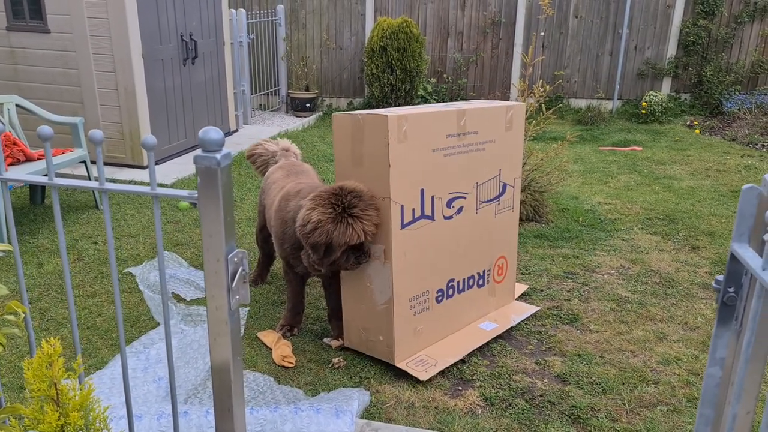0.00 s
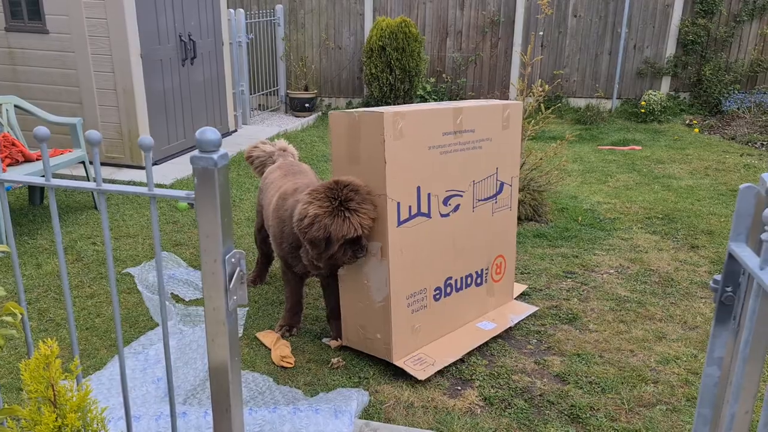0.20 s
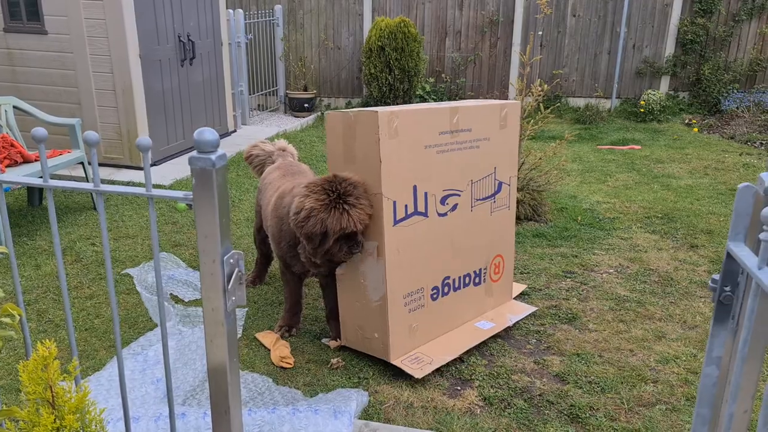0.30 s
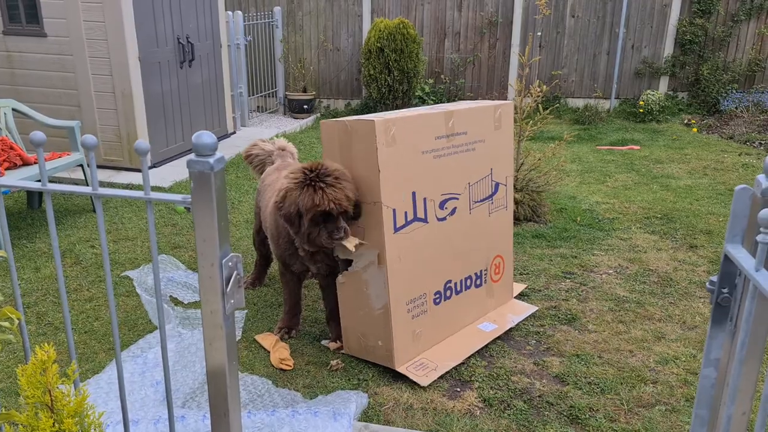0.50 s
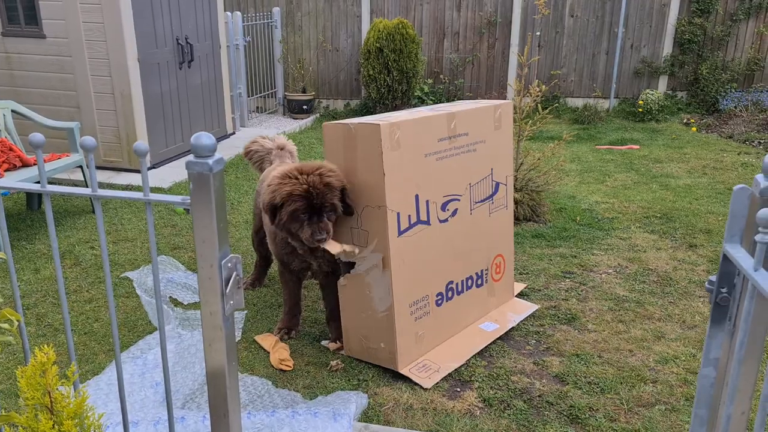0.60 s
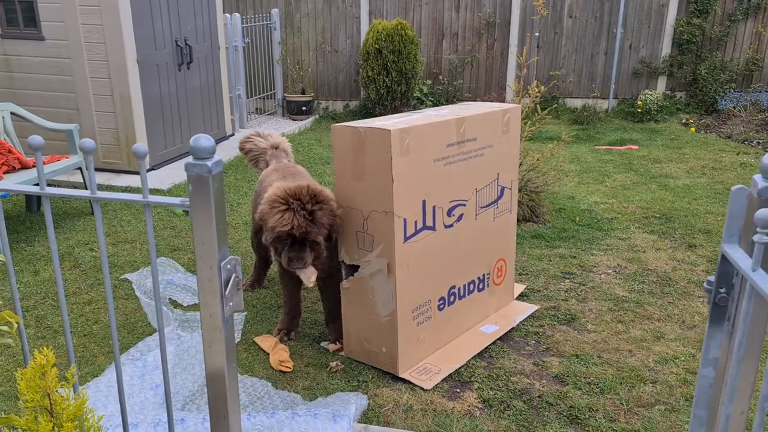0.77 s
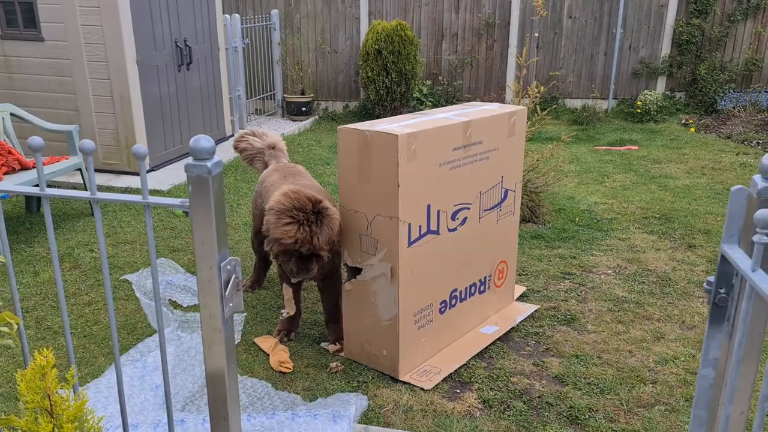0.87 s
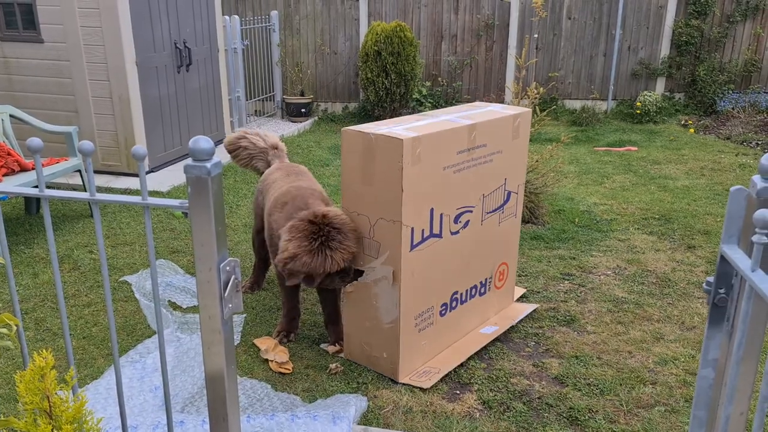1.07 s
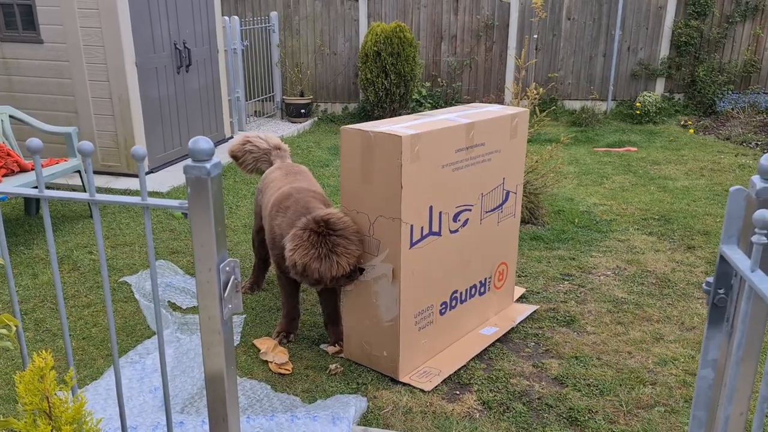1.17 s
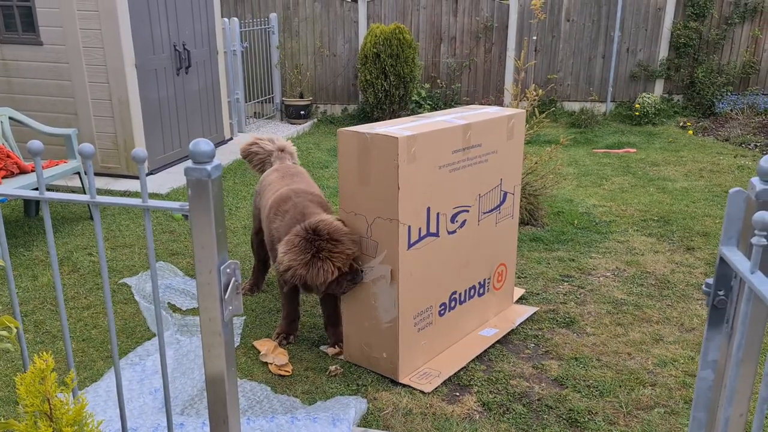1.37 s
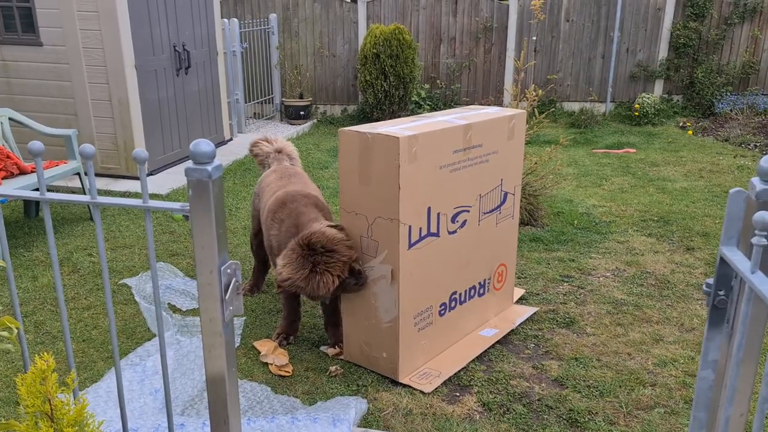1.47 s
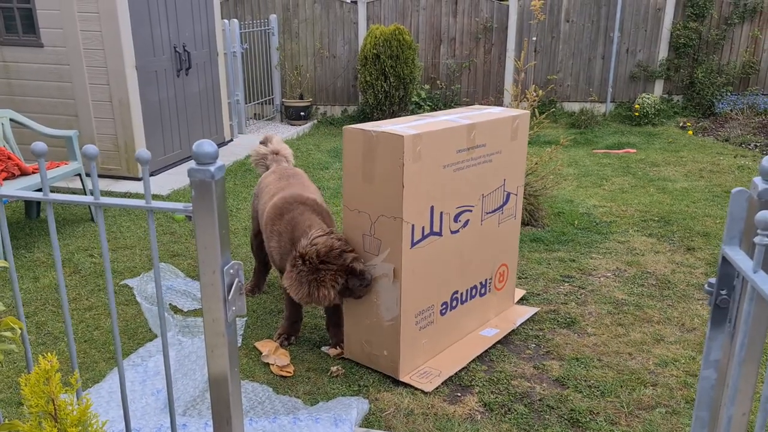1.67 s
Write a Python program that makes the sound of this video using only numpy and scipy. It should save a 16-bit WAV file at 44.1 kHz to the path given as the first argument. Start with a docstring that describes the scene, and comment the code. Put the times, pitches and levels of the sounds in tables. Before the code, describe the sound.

A dog rips a tall cardboard box on a lawn, fibres crackling and walls booming, then pauses and nudges it with a dull scuff; distant birdsong and soft outdoor hush, picked up by a phone from a few metres.

```python
"""Teeth and fur brush card over a garden hush; then a big dog tugs and rips a strip off a tall cardboard box
on a lawn, a few metres from a phone. Fibres and plies crackle as clumped random clicks, and each tug
booms in the box as decaying wall modes, a flex and a thud; later the muzzle bumps it.
Far off a small bird sings gliding sine notes; shaped noise makes the hush, the road and the fence echo."""
import sys
import numpy as np
from scipy import signal
from scipy.fft import rfft, irfft, next_fast_len
from scipy.io import wavfile
from scipy.ndimage import uniform_filter1d, map_coordinates

SR = 44100
rng = np.random.default_rng(int(sys.argv[2]) if len(sys.argv) > 2 else 0)


def dump_mix(stems):
    """Bounce the given channels to the path in sys.argv[1] as a 16-bit WAV at rate SR."""
    frames = np.atleast_2d(stems).T  # one column per channel
    limited = np.clip(frames, -1, 1)  # hard clip at full scale
    pcm = np.round(limited * 32767).astype(np.int16)
    wavfile.write(sys.argv[1], SR, pcm)


def nominal_scale(level):
    """Amplitude ratio for a level in decibels (scalar or array-like)."""
    x = np.asarray(level, float) / 20
    return 10 ** x


N = 74970

# modes of the box walls: (frequency [Hz], level [dB], t60 [s])
BOX_MODES = [(109.4, -8.5, 0.23), (152, 4, 0.095), (183.3, 4, 0.17), (234.5, -1.5, 0.15), (292.6, 0, 0.19),
             (341, -6.5, 0.089), (408.5, -4, 0.079), (456.2, -2, 0.074), (521, -9, 0.19), (677, -6, 0.1),
             (732, -9, 0.14), (1016, -9, 0.04), (1083, -26, 0.37), (1190, -7.5, 0.2), (1322, -8, 0.17),
             (2195, -8, 0.094)]
# likeness of the two microphones for the near sounds: (frequency [Hz], correlation [-1 to 1])
NEAR_ALIKE = [(60, 0.36), (290, 1), (640, 0.23), (1400, 0.39), (3100, 0.097), (6800, 0.68), (15000, 0.12)]
# left-right balance of the near sounds: (frequency [Hz], left over right [dB])
NEAR_LEAN = [(300, 2), (700, -0.5), (1300, -8), (2400, -1), (4400, 0.5), (8100, -1.5), (15000, -9.5)]


def unit(x):
    """Scales to rms 1."""
    return x / np.sqrt(np.mean(x ** 2) + 1e-20)


def along(points, hz):
    """Reads (Hz, value) points on a log frequency axis."""
    f, v = np.transpose(points)
    return np.interp(np.log(hz + 1), np.log(f + 1), v)


def curves(rows):
    """One value per sample for each column after the time."""
    s, *cols = np.transpose(rows)
    return [np.interp(np.arange(N) / SR, s, c) for c in cols]


def wobble(rate):
    """A smooth random curve, rate knots a second."""
    return map_coordinates(rng.standard_normal(N // 50), [np.arange(N) * rate / SR])


def filtered(x, response):
    """x through a complex response of frequency."""
    m = next_fast_len(N + SR // 2)
    return irfft(rfft(x, m) * response(np.fft.rfftfreq(m, 1 / SR)), m)[..., :N]


def ringing(modes):
    """Response of decaying modes (Hz, dB, t60), each starting at its level."""
    def response(f):
        total = 0
        for hz, db, t60 in modes:
            damping = 1j * f * np.log(1000) / (np.pi * t60)
            total = total + nominal_scale(db) * SR * hz / (2 * np.pi) / (hz * hz - f * f + damping)
        return total
    return response


def snaps(per_s, spread_db):
    """Two independent streams of random clicks of uneven size, per_s clicks a second in each."""
    hit = rng.random((2, N)) < per_s / SR
    return hit * rng.standard_normal((2, N)) * nominal_scale(spread_db * rng.exponential(size=(2, N)))


def spread(pair, spectrum, alike, lean, lag_us=48.6):
    """Colours two streams and mixes them to stereo of given likeness, balance and left lag; mid rms 1."""
    def mid_side(hz):
        turn = np.arccos(np.clip(along(alike, hz), -1, 1)) / 2
        return nominal_scale(along(spectrum, hz)) * [np.cos(turn), np.sin(turn)]

    def left_right(hz):
        # half of the balance and lag on the left, the inverse on the right
        half = nominal_scale(along(lean, hz) / 2) * np.exp(-1j * np.pi * hz * lag_us / 10 ** 6)
        return np.array([half, 1 / half])

    mid, side = filtered(pair, mid_side)
    both = filtered(np.array([mid + side, mid - side]), left_right)
    return both / np.sqrt(np.mean(both.mean(axis=0) ** 2))


def patchy(pair, depth_db, bins_count, frames_count):
    """Random gain patches over time and frequency, depth_db rms."""
    z = signal.stft(pair, nperseg=512)[2]
    field = rng.standard_normal(z.shape[1:])
    field = uniform_filter1d(uniform_filter1d(field, bins_count, 0), frames_count, 1)
    return signal.istft(z * nominal_scale(depth_db * unit(field)), nperseg=512)[1][:, :N]


def garden():
    """Far traffic and leaves as a patchy low hush of noise, over the steady rumble of a distant road."""
    # far traffic and leaves: (time [s], level [dB])
    air = [(0, -51.5), (.17, -53.5), (.7, -60), (.8, -60.5), (.9, -61), (1.0, -61.5), (1.1, -58),
           (1.35, -65), (1.5, -69.5), (1.58, -61.5), (1.7, -64)]
    # colour of the hush: (frequency [Hz], level [dB])
    hush_colour = [(25, -7), (100, -18.5), (160, -5), (290, 2), (430, -8), (1300, -9.5), (2100, -7),
                   (2800, -17.5), (4500, -20), (6500, -22), (7300, -26.5), (8300, -29), (9500, -19),
                   (12000, -27), (15900, -32)]
    # colour of the distant road: (frequency [Hz], level [dB])
    road_colour = [(20, 10), (50, 13), (100, 14), (200, -28), (400, -76)]
    # likeness of the two microphones for far sound: (frequency [Hz], correlation [-1 to 1])
    far_alike = [(60, 0.4), (290, 0.97), (640, 0.46), (1400, 0.23), (3100, 0.042), (15000, 0.25)]
    even = [(100, -0.22), (10000, -1.6)]  # (frequency [Hz], left over right [dB])
    road_db, gust_db = -82, 0.7
    air_db, = curves(air)
    pair = patchy(rng.standard_normal((2, N)), depth_db=4, bins_count=4, frames_count=10)
    road = nominal_scale(road_db) * spread(rng.standard_normal((2, N)), road_colour, far_alike, even, lag_us=0)
    hush = spread(pair, hush_colour, far_alike, even, lag_us=0)
    return road + nominal_scale(air_db + gust_db * wobble(10.13)) * hush


def bird():
    """Each note is a sine that drops onto its held pitch and flutters with a slight burr."""
    # notes: (start [s], length [s], held pitch [Hz], start above it [Hz], relative level [dB])
    song = [(.772, .03, 4900, 1200, -72), (.848, .047, 4880, 550, -66), (.92, .11, 4880, 150, -74),
            (1.005, .138, 3790, 600, -65), (1.066, .02, 4260, 80, -64), (1.128, .03, 3050, 700, -67),
            (1.412, .145, 4270, 20, -73.5), (1.585, .014, 4750, 350, -66)]
    rise_s, drop_s = 0.004, 0.012  # time constants
    flutter_hz, flutter_depth = 60, 0.15
    burr_share, waver_db = 0.16, 1.3  # pitch burr as a share of each note's drop; level waver
    out = np.zeros(N + SR)
    burr = burr_share * wobble(300)
    for s, length, hz, over_hz, db in song:
        t = np.arange(round(length * SR)) / SR
        start = round(s * SR)
        flutter = 1 + flutter_depth * np.sin(2 * np.pi * flutter_hz * t)
        shape = (1 - np.exp(-t / rise_s)) * (1 - (t / length) ** 8) * flutter
        pitch = hz + over_hz * (burr[start:][:len(t)] + np.exp(-t / drop_s))
        out[start:][:len(t)] += nominal_scale(db + 6.5) * shape * np.sin(2 * np.pi * np.cumsum(pitch) / SR)
    return out[:N] * nominal_scale(waver_db * wobble(40))


def fence(x):
    """Fences and shed answer; each frequency dies at its own speed, the bass alike on both sides."""
    # decay of the answer: (frequency [Hz], t60 [s])
    decay = [(100, 0.25), (1000, 0.14), (10000, 0.029)]
    hz, t, z = signal.stft(rng.standard_normal((2, SR // 2)), SR, nperseg=256)
    z = np.array([z[0], np.where(hz[:, None] < 200, z[0], z[1])])
    tail = signal.istft(z * nominal_scale(-60 * t / along(decay, hz)[:, None]), SR, nperseg=256)[1]
    tail = tail / np.linalg.norm(tail[0])
    late = np.pad(x, (500, 0))[None]  # 500 samples on the way there and back
    return signal.fftconvolve(late, tail, axes=1)[:, :N]


def scuffs():
    """Fur and teeth brush the card: grainy clicks rise and decay, with a dull and a bright part."""
    # brushes: (time [s], dull level [dB], rise time constant [s], t60 [s], bright level [dB])
    brushes = [(.02, -50, 0.09, 0.34, -38.5), (0.665, -51, 0.0071, 0.12, -57),
               (0.808, -61, 0.0051, 0.98, -69.5), (0.854, -58.5, 0.015, 0.22, -78),
               (1.028, -54.5, 0.02, 0.18, -62), (1.087, -79, 0.0034, 0.021, -52),
               (1.161, -37.5, 0.011, 0.25, -58.5), (1.262, -53, 0.0034, 0.065, -62),
               (1.399, -63, 0.0013, 0.38, -62.5), (1.489, -65.5, 0.015, 0.52, -67.5),
               (1.586, -57, 0.0036, 0.041, -60), (1.639, -59, 0.0066, 0.1, -66)]
    # colour of the dull part: (frequency [Hz], level [dB])
    dull_colour = [(250, -12), (450, 0), (800, -5), (1200, -6), (1900, -4), (2500, -13.5), (3500, -20),
                   (5200, -25.5), (8000, -55)]
    # colour of the bright part: (frequency [Hz], level [dB])
    bright_colour = [(2000, -16), (4000, -2), (6500, -7.5), (8300, -4.5), (10000, -3), (12500, -11),
                     (15000, -10), (16000, -11)]
    grains_per_s, grain_spread_db = 8000, 1.8
    since = np.clip(np.arange(N) / SR - np.array(brushes)[:, :1], 0, 9)
    dull_db, rise, t60, bright_db = np.transpose(brushes)[1:, :, None]
    shape = nominal_scale(-60 * since / t60 + 0.79 * wobble(67.7)) * (1 - np.exp(-since / rise))
    dull = spread(snaps(grains_per_s, grain_spread_db), dull_colour, NEAR_ALIKE, NEAR_LEAN)
    bright = spread(snaps(grains_per_s, grain_spread_db), bright_colour, NEAR_ALIKE, NEAR_LEAN)
    return (nominal_scale(dull_db) * shape).sum(axis=0) * dull + (nominal_scale(bright_db) * shape).sum(axis=0) * bright


def jolts():
    """Each tug or bump is a soft push: a dead thud, wall modes in a fresh mix, a flex of the big face."""
    # tugs and bumps: (time [s], relative wall ring [dB], contact [ms], flex [dB], relative thud [dB])
    pushes = [(.004, -45, 2.24, -61, -42), (0.191, -33, 1.6, -26.5, -30), (0.202, -45, 1.2, -30, -41),
              (0.242, -24.5, 2.12, -32, -27.5), (0.261, -33, 1.75, -37, -32.5),
              (0.302, -32.5, 2.53, -29.5, -26), (0.3364, -25.5, 2.54, -21, -13.5),
              (0.351, -24, 2.22, -31, -31), (0.363, -15, 2.52, -30, -14.5), (.381, -16.5, 2.12, -18.5, -22),
              (.398, -37, 3.06, -17, -18), (0.411, -17.5, 2.68, -23.5, -21.5),
              (.424, -24.5, 2.02, -26, -24.5), (0.442, -43, 2.24, -26, -53), (0.518, -26, 2.9, -28, -34),
              (0.564, -53, 1.73, -41.5, -35), (0.609, -38, 2.37, -29, -28), (0.64, -51, 2.5, -33, -45),
              (0.713, -67, 2.6, -54.5, -47.5), (1.1543, -24, 3.3, -70, -19), (1.1552, -45, 1.07, -70, -30),
              (1.166, -33, 1.15, -70, -37), (1.185, -36, 1.2, -70, -40), (1.209, -41, 2.8, -70, -38),
              (1.248, -48, 3, -70, -44), (1.262, -43.5, 2.86, -72, -40), (1.278, -51, 2.85, -74, -52.5)]
    mix_db = 2  # standard deviation of each mode's level from push to push
    flex_hz, flex_t60 = 49, 0.22  # the big face flexing as a whole
    thud_cycles_per_contact, thud_t60 = 0.422, 0.048  # the air in the box, pushed once
    out, t = np.zeros(N + SR), np.arange(SR // 2) / SR
    mix = rng.standard_normal((len(pushes), len(BOX_MODES)))
    hz, level, t60 = np.transpose(BOX_MODES)[:, :, None]
    for (s, db, ms, flex_db, thud_db), m in zip(pushes, mix):
        soft = 1 / (1 + (hz * ms / 900) ** 2)  # a longer contact excites less treble
        mode_amp = soft * nominal_scale(level + mix_db * m[:, None] - 60 * t / t60)
        ring = (mode_amp * np.sin(2 * np.pi * hz * t)).sum(axis=0)
        flex = nominal_scale(flex_db - 60 * t / flex_t60) * np.sin(2 * np.pi * flex_hz * t)
        flex = flex * (1 - np.exp(-t / 0.016))
        thud_hz = thud_cycles_per_contact / (ms / 1000)
        thud = nominal_scale(thud_db + 6 - 60 * t / thud_t60) * np.sin(2 * np.pi * thud_hz * t)
        onset = 1 - np.exp(-(t / 0.003) ** 2)
        out[round(s * SR):][:len(t)] += flex + (nominal_scale(db - 5.5) * ring - thud) * onset
    return out[:N]


def cracks():
    """Single plies crack out loud: each is a short noisy burst in a few dead modes."""
    # cracks: (time [s], relative level [dB])
    loud_plies = [(0.195, -33.5), (0.2456, -35), (0.3369, -27.5), (0.3515, -21), (0.364, -29), (.4416, -31),
                  (.567, -34), (.591, -32), (0.609, -35.5), (1.1543, -38), (1.182, -46)]
    # modes of a cracking ply: (frequency [Hz], level [dB], t60 [s])
    ply_modes = [(1200, 0, .015), (2100, -1, .012), (4800, -12, .004), (10500, -16, .004)]
    kicks = np.zeros(N)
    bursts = rng.standard_normal((len(loud_plies), 60)) * np.exp(-np.arange(60) / 25)
    for (s, db), burst in zip(loud_plies, bursts):
        kicks[round(s * SR):][:60] += nominal_scale(db - 15) * burst
    return filtered(kicks, ringing(ply_modes)) * nominal_scale([[-1.5], [1.5]])  # a little to the right


def rip():
    """Fine fibres hiss; coarse plies crackle in clumps, drum the walls and ring the torn strip."""
    # course of the rip: (time [s], fibre crackle [dB], coarse ply force over fibre [dB])
    course = [(0.0, -61.5, -2), (0.082, -63, -1), (0.098, -80, -39), (0.136, -53, -12), (0.176, -57.5, -2),
              (0.196, -41, -2), (0.23, -57, 3.5), (0.258, -43, 0.5), (0.296, -51.5, -1.5),
              (0.308, -45.5, 0), (0.352, -42.5, 5.5), (0.38, -43.5, -0.5), (0.418, -42.5, 3),
              (0.476, -36, 2.5), (0.506, -38, 2.5), (0.572, -36.5, -1), (0.61, -38, 3.5), (0.63, -52, -0.5),
              (0.688, -73.5, -5), (0.75, -59.5, 15.5)]
    # colour of the fibres: (frequency [Hz], level [dB])
    fibre_colour = [(1530, -22.5), (2600, -10), (2910, -9.5), (3440, -18.5), (4840, -9), (6910, -16.5),
                    (10400, -2.5), (13200, -10), (15100, -3.5), (15900, -65)]
    # colour of the plies: (frequency [Hz], level [dB])
    ply_colour = [(190, -87), (330, -13), (432, -6), (646, -1), (875, -38), (923, -1.5), (1090, -21.5),
                  (1310, -1), (1550, -8.5), (1870, -1), (2800, -22), (3640, -57), (6160, -120)]
    # ring of the strip while short, then once long: (frequency [Hz], level [dB], t60 [s])
    strip_modes = [(1950, -8, .015), (1120, 0, .025)]
    strip_long_s = 0.535  # time at which the strip has grown long and rings lower
    fibres_per_s, fibre_spread_db = 14000, 1.8
    plies_per_s, ply_spread_db = 7000, 2.2
    shake_db, drum_tilt_db = -2, 2  # drum level; tearing favours the higher wall modes
    fibre_db, ply_db = curves(course)
    fade = np.clip((course[-1][0] - np.arange(N) / SR) / 0.061, 0, 1)
    clumps = 0.99 * wobble(88.55)

    fibres = spread(snaps(fibres_per_s, fibre_spread_db), fibre_colour, NEAR_ALIKE, NEAR_LEAN)
    fine = nominal_scale(fibre_db + clumps + wobble(34.7)) * fibres

    force = fade * nominal_scale(fibre_db + ply_db + clumps)
    # the torn flap's resonances shift as it comes away
    plies = patchy(snaps(plies_per_s, ply_spread_db), depth_db=2.5, bins_count=2, frames_count=9)
    coarse = force * nominal_scale(-4.0) * spread(plies, ply_colour, NEAR_ALIKE, NEAR_LEAN)

    walls = lambda hz: ringing(BOX_MODES)(hz) * nominal_scale(drum_tilt_db * np.log2(hz / 500 + 0.3))
    tearing = unit(plies[1])
    scale = tearing.std() / filtered(tearing, walls).std()
    drum = scale * filtered(force * tearing, walls)

    long = 1 / (1 + np.exp((strip_long_s - np.arange(N) / SR) / 0.03))
    short_ring, long_ring = [nominal_scale(db) * unit(filtered(plies[0], ringing([(hz, db, t60)])))
                             for hz, db, t60 in strip_modes]
    strip = force * ((1 - long) * short_ring + long * long_ring)
    return strip + fade * fine + coarse + nominal_scale(shake_db) * drum


def scene():
    """Box and dog near, bird and garden far; the fence answers box and bird."""
    box = rip() + cracks() + jolts() + scuffs()
    song = bird()
    box_echo = nominal_scale(-11.5) * fence(box.mean(axis=0))
    song_echo = nominal_scale(-10) * fence(song)
    return box + box_echo + 0.51 * song + song_echo + garden()


def low_pass(x):
    """Removes everything above the highest recorded frequency."""
    return signal.sosfilt(signal.butter(12, 16760, fs=SR, output="sos"), x)


def record(dry):
    """The phone's low cut: a resonant second-order high-pass."""
    cut_hz = 51.6
    cut = lambda hz: -hz * hz / (cut_hz ** 2 - hz * hz + 1.2j * hz * cut_hz)
    return low_pass(filtered(dry, cut))


dry = scene()
out = record(dry)
dump_mix(out)
```